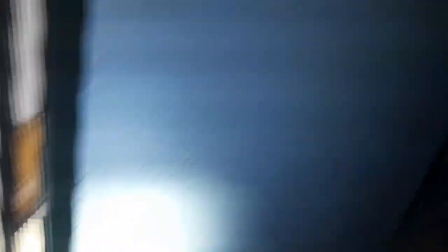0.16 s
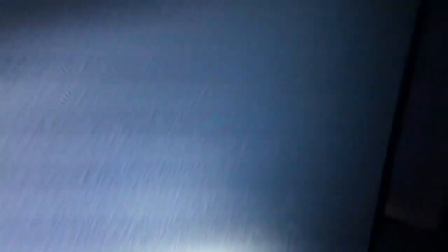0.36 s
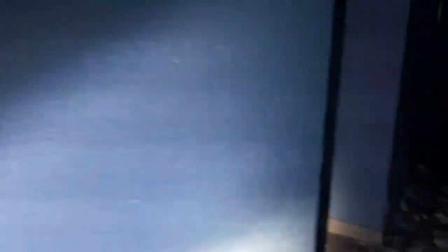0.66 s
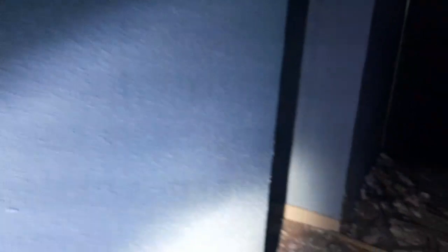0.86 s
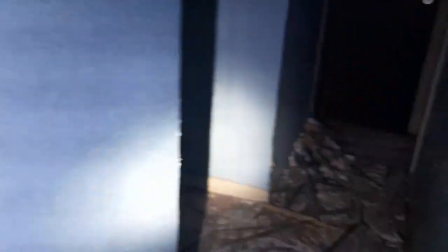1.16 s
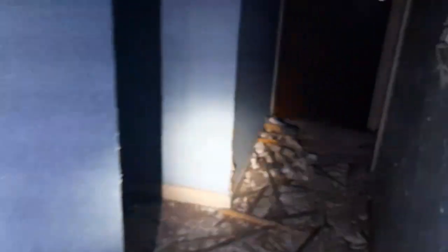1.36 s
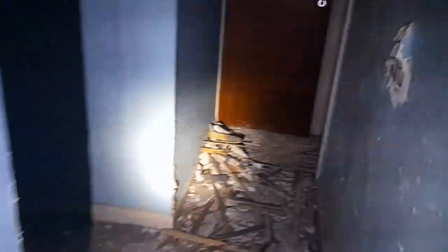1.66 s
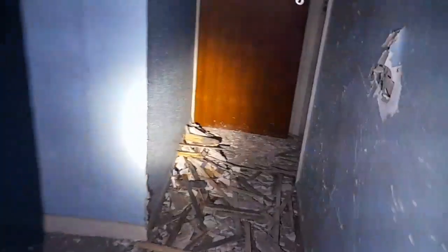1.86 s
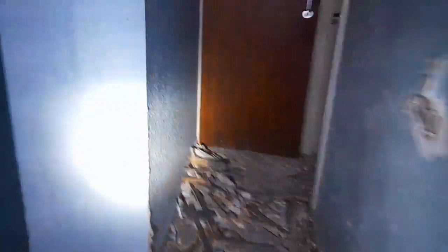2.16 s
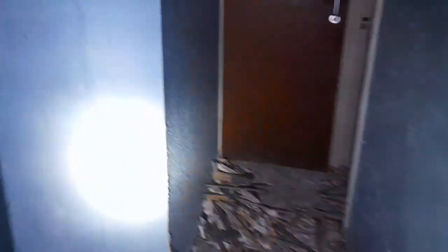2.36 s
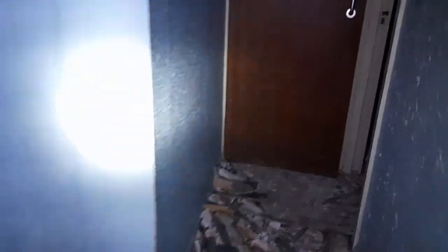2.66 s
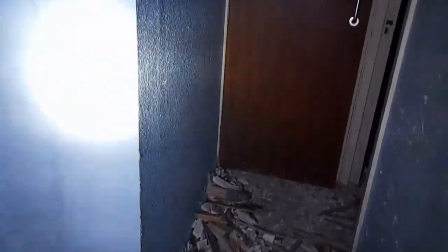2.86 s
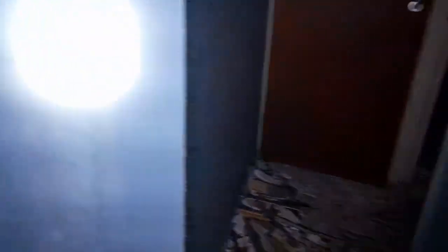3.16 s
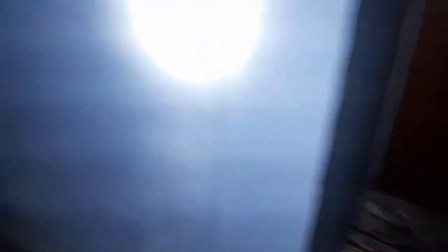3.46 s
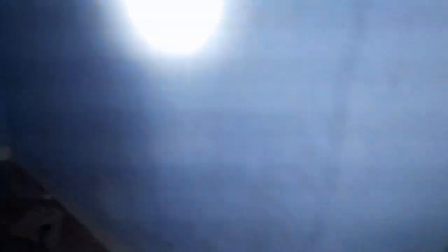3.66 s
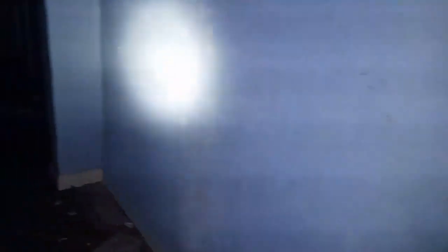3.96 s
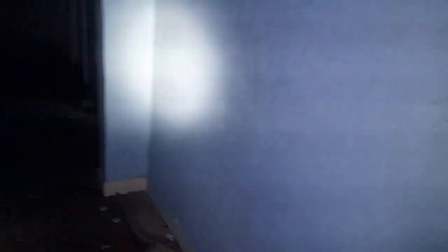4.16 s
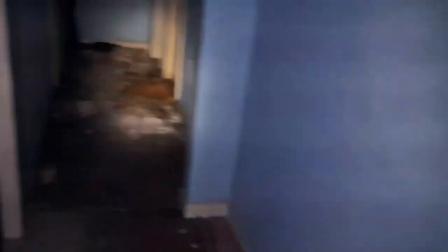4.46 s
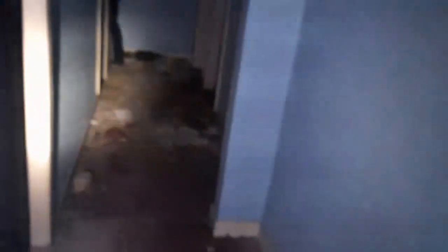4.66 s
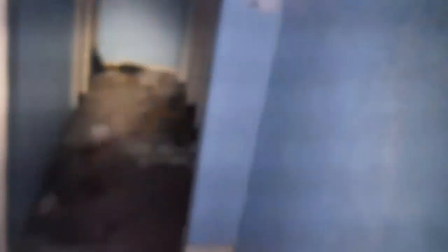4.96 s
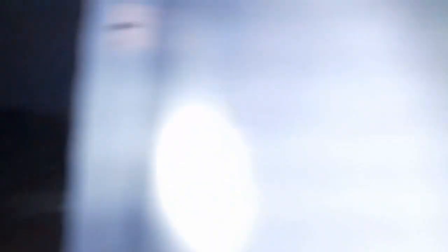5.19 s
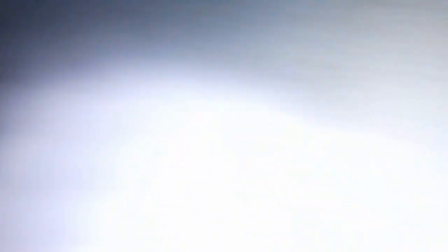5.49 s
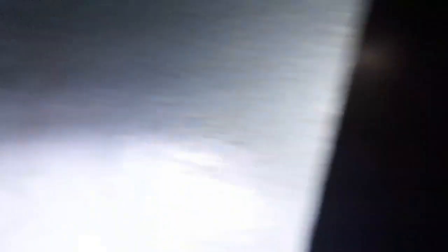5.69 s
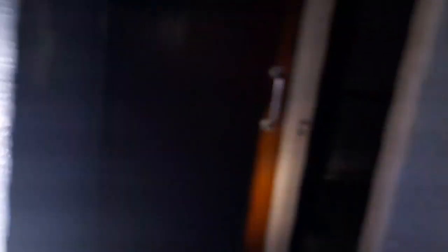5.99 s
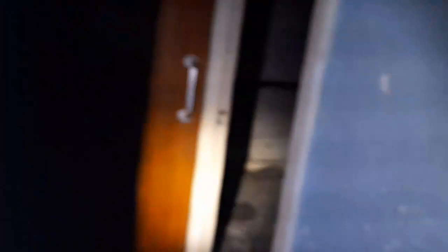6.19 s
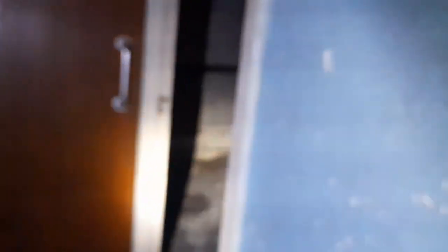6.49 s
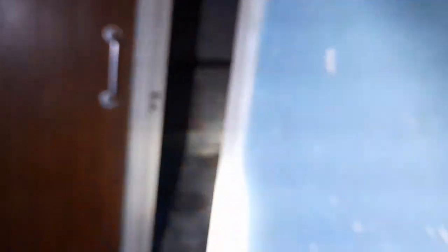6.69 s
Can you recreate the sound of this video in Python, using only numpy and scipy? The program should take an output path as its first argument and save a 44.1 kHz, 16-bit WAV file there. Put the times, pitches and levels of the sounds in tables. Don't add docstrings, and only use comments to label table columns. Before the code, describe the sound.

Footsteps knock on a hollow, gritty floor in a small empty corridor, with cloth rustle, a short door judder and bright debris snaps.

```python
import sys
import numpy as np
from scipy import signal
from scipy.io import wavfile

SR = 44100
rng = np.random.default_rng(int(sys.argv[2]) if len(sys.argv) > 2 else 0)


def transcribe(u):
    v = np.clip(np.atleast_2d(u).T, -1, 1)
    q = np.round(v * 32767).astype(np.int16)
    wavfile.write(sys.argv[1], SR, q)


def voltage_ratio(decibels):
    exponent = np.asarray(decibels, float) / 20
    return 10 ** exponent


N = 301283


def rms_one(x):
    return x / np.sqrt(np.mean(x ** 2) + 1e-20)


def at_hz(points, hz):
    points_hz, values = np.array(points)[:, 0], np.array(points)[:, 1]
    return np.interp(np.log(hz), np.log(points_hz), values)


def band(x, low_hz, high_hz):
    edges_hz = [low_hz, min(high_hz, 0.45 * SR)]
    return signal.sosfilt(signal.butter(2, edges_hz, "band", fs=SR, output="sos"), x)


def drift(rate):
    r = np.exp(-80 * np.pi * rate / SR)
    slow = signal.lfilter([1], [1, -2 * r, r * r], rng.standard_normal(N // 40 + 2002))[2000:]
    return np.interp(np.arange(N) / 40, np.arange(len(slow)), rms_one(slow))


def fade(clicks, t60):
    return signal.lfilter([1], [1, -voltage_ratio(-60 / (t60 * SR))], clicks)


def ring(clicks, hz, t60):
    r = voltage_ratio(-60 / (max(t60, 0.001) * SR))
    w = 2 * np.pi * hz / SR
    return signal.lfilter([0, np.sin(w)], [1, -2 * r * np.cos(w), r * r], clicks + 1e-18)


def stereo_bands(size, low_hz, high_hz, gain_of_band):
    # [f/Hz, left-right likeness]
    likeness = [(60, 0.9), (130, 0.98), (290, 0.76), (640, 0.4), (1410, -0.21), (3100, -0.066),
                (6820, -0.11), (15000, -0.15)]
    edges = low_hz * 2 ** np.arange(0, np.log2(high_hz / low_hz) + 0.3, 1 / 3)
    white = rng.standard_normal((2, 2, size))
    out = 0
    for k, (low, high) in enumerate(zip(edges, edges[1:])):
        centre_hz = np.sqrt(low * high)
        mid, side = band(white[k % 2], low, high)
        alike = np.clip(at_hz(likeness, centre_hz), -1, 1)
        pair = np.sqrt(1 + alike) * mid + np.sqrt(1 - alike) * side * [[1], [-1]]
        out = out + gain_of_band(centre_hz) * pair
    return rms_one(out)


def friction(spectrum, level_db, patchy_db, grains_per_s, grain_db):
    together = drift(62.0)

    def patchy_gain(hz):
        return voltage_ratio(at_hz(spectrum, hz) + patchy_db * (0.45 * together + drift(8.0)))

    top_hz = max(hz for hz, db in spectrum if db > -90)
    noise = stereo_bands(N, spectrum[0][0], top_hz, patchy_gain)
    grain_size = np.minimum(rng.exponential(1, N), 3) ** 2
    grains = (rng.random(N) < grains_per_s / SR) * grain_size
    flare = fade(grains, 0.0072)
    return voltage_ratio(level_db) * rms_one(noise * (1 + voltage_ratio(grain_db) * flare))


def swells(rows, still_db):
    t = np.arange(0, N, 32) / SR
    power = voltage_ratio(2 * still_db)
    for s, rise, fall, db in rows:
        climbing = (s - t) / max(rise, 0.01)
        dying = (t - s) / max(fall, 0.01)
        power = power + voltage_ratio(2 * (db - 20 * np.where(t < s, climbing, dying)))
    return np.interp(np.arange(N) / SR, t, 10 * np.log10(power))


def movement():
    # [peak t/s, rise/s, fall/s, level/dB]
    rustles = [(.5, 0.36, 0.17, -46.5), (.755, 0.16, 0.29, -46), (1.03, 0.36, 0.24, -55),
               (1.5, 0.18, 0.33, -51), (1.69, 0.28, 0.037, -54.5), (1.9, 0.11, 1, -43),
               (2.03, 0.87, 0.66, -44.5), (2.17, .4, .3, -47), (2.28, 0.25, 0.18, -43),
               (2.54, 0.53, 0.049, -57), (2.605, 0.045, 0.045, -78.5), (2.71, 0.024, 0.15, -47),
               (2.88, .1, 0.079, -61.5), (2.99, 0.082, 0.061, -66), (3.32, 0.13, 0.3, -45),
               (3.5, 0.57, 0.67, -54.5), (3.65, 0.11, 0.11, -43.5), (3.82, 1, 0.22, -49),
               (4.62, 0.073, 0.94, -56), (4.72, 0.29, 0.13, -45), (5.04, 0.53, 0.67, -51.5),
               (5.24, 0.22, 0.17, -51), (5.66, 0.27, 0.49, -47), (5.88, 0.64, 0.1, -58),
               (6.2, 1, 0.96, -62), (6.49, 0.18, 0.51, -51), (6.59, 0.38, 0.029, -47),
               (6.765, 0.24, 0.17, -59)]
    # [peak t/s, rise/s, fall/s, level/dB]
    scuffs = [(0, .1, 0.069, -52.5), (.34, 0.32, 1.3, -53), (.51, 0.068, 0.12, -44.5),
              (.8, 0.23, 0.12, -46.5), (1.03, 0.22, 0.26, -52), (1.69, 0.35, 0.041, -48.5),
              (1.89, 0.14, 0.3, -49), (2.01, .15, 0.24, -49), (2.28, 0.032, 0.23, -30),
              (2.39, 0.2, 0.031, -49), (2.46, .04, 0.25, -43.5), (2.99, 0.34, 0.15, -58.5),
              (3.3, 0.18, 0.24, -46), (3.62, 0.35, 0.39, -47.5), (4.24, 0.098, 1.25, -52),
              (4.57, 0.051, 1.14, -49), (4.75, 0.17, 0.56, -48.5), (5.05, 0.29, 0.31, -59.5),
              (5.24, 0.24, 0.38, -50), (5.72, 0.91, 0.13, -51), (5.88, 0.12, 0.13, -49.5),
              (6.47, 0.041, 0.39, -45.5), (6.59, 0.11, 0.029, -46), (6.74, 0.075, 1.3, -57)]
    # [peak t/s, rise/s, level/dB]
    loads = [(0, .1, -61.5), (.43, 0.14, -59), (.74, 0.29, -62), (1.12, 0.16, -56), (1.41, 0.071, -70),
             (1.6, 0.37, -49.5), (1.89, 0.24, -45), (2.01, 0.032, -47.5), (2.39, 0.14, -34),
             (2.55, 0.76, -56), (2.71, 0.031, -35), (2.83, 0.28, -65), (3.28, 0.062, -36.5),
             (3.499, 0.38, -57), (3.64, 0.28, -53.5), (3.761, 0.031, -47), (4.358, 0.15, -44.5),
             (4.56, 0.014, -49.5), (4.76, 0.3, -43), (4.9, 0.29, -62), (5.13, 0.35, -55),
             (5.24, 0.1, -50.5), (5.67, 0.1, -50), (6.0, 0.19, -55), (6.219, 0.47, -63.5),
             (6.592, 0.16, -48), (6.82, 0.26, -46)]
    # [peak t/s, level/dB]
    jolts = [(0, -66), (.51, -36.5), (.77, -49), (0.839, -48.5), (1.34, -54), (1.5, -47), (1.6, -69),
             (1.89, -46), (2.28, -56), (2.71, -58), (2.89, -64), (2.988, -52), (3.3, -49), (3.78, -42),
             (3.888, -48), (4.24, -53), (4.33, -51), (4.62, -54), (4.76, -55), (5.67, -63), (5.97, -55),
             (6.46, -50.5), (6.52, -41), (6.59, -52), (6.73, -42.5), (6.82, -51)]
    # cloth, grit, boards, hand [level/dB]
    still_db = (-74.5, -77.5, -88.5, -76.5)
    settle_s, jolt_rise_s, jolt_fall_s = 0.17, 0.05, 0.1
    cloth = np.concatenate([rustles, np.add(scuffs, [0, 0, 0, -11.5])])
    grit = np.concatenate([scuffs, np.add(rustles, [0, 0, 0, -7.5])])
    boards = [(s, rise, settle_s, db) for s, rise, db in loads]
    hand = [(s, jolt_rise_s, jolt_fall_s, db) for s, db in jolts]
    return [swells(rows, db) for rows, db in zip([cloth, grit, boards, hand], still_db)]


def mic_hiss():
    return voltage_ratio(-77) * rng.standard_normal((2, N))


def hand_sway(level_db):
    # [f/Hz, level/dB per Hz]
    sway = [(25, -23.5), (40, -6), (62, -5.5), (85, -3), (110, -19)]
    return friction(sway, level_db, patchy_db=8.0, grains_per_s=4.6, grain_db=-22.5)


def board_rumble(level_db):
    # [f/Hz, level/dB per Hz]
    rumble = [(53, -28), (90, -13), (135, 2), (262, 1), (400, -6.5), (500, -28.5), (650, -52), (1100, -120)]
    return friction(rumble, level_db, patchy_db=4.0, grains_per_s=14.0, grain_db=-35.0)


def cloth_rustle(level_db):
    # [f/Hz, level/dB per Hz]
    fabric = [(710, -35), (1200, -16), (1590, -3), (1730, -5), (1950, -12), (2130, 5.5), (2830, -7.5),
              (3360, -1.5), (7020, -5), (9210, -7.5), (9930, -8), (13900, -8), (16000, -12)]
    return friction(fabric, level_db, patchy_db=1.87, grains_per_s=120.0, grain_db=-14.0)


def grit_scuff(level_db):
    # [f/Hz, level/dB per Hz]
    grinding = [(150, -29), (250, -2.5), (426, -5), (538, -1), (1090, -5), (1420, -7), (1560, -7.5),
                (2370, -14), (4000, -26), (5200, -35.5), (8800, -120)]
    return friction(grinding, level_db, patchy_db=3.0, grains_per_s=43.0, grain_db=-16.0)


def judder():
    # [t/s, slips per s, level/dB]
    drag = [
        (2.26, 71, -36.5),
        (2.3, 71.3, -19),
        (2.324, 79, -12.5),
        (2.334, 88, -9.5),
        (2.352, 81.5, -11),
        (2.368, 83, -20.5),
        (2.38, 120, -37),
        (2.4, 79, -52),
    ]
    s, rates, levels = np.transpose(drag)
    t = np.arange(N) / SR
    moving = (t > s[0]) & (t < s[-1])
    return np.interp(t, s, rates), np.interp(t, s, levels), moving


def door_panel():
    # [f/Hz, level/dB, t60/s]
    modes = [(167, -4, 0.05), (244, 7, 0.064), (334, -26, 0.054), (536, -13.5, 0.048), (730, -7.5, 0.046),
             (820, -48.5, .04)]
    per_s, level_db, moving = judder()
    turns = np.cumsum(per_s * (1 + 0.04 * drift(31.2)) / SR)
    slips = np.diff(np.floor(turns), prepend=0) * moving * voltage_ratio(level_db - 5.5)
    panel = sum(voltage_ratio(db) * ring(slips, hz, t60) for hz, db, t60 in modes)
    panel = signal.sosfilt(signal.butter(4, 135, "high", fs=SR, output="sos"), panel)
    return panel * voltage_ratio([[-1.0], [1.0]])


def door_scrape():
    _, level_db, moving = judder()
    body = band(rng.standard_normal((2, N)), 450, 2500)
    grind = body + voltage_ratio(-6.5) * rng.standard_normal((2, N))
    return band(voltage_ratio(level_db - 16.5) * grind * moving, 100, 14000)


def squeak():
    # start t/s, end t/s, f/Hz, level/dB
    rubber = (3.771, 3.815, 12700, -62)
    start, end, hz, db = rubber
    t = np.arange(N) / SR
    tone = rms_one(ring(ring(rng.standard_normal(N), hz, 0.012), hz, 0.012))
    return voltage_ratio(db) * tone * np.sin(np.pi * np.clip((t - start) / (end - start), 0, 1)) ** 0.5


def snaps(table, crumble_db, crumble_t60, lag=0, lag_spread=16):
    rows = np.array(table)
    chance = rng.uniform(-0.89, 1, (len(table), 2))
    at = ((rows[:, 0] + 0.0007) * SR).astype(int)
    at_right = at + lag + (lag_spread * chance[:, 0]).astype(int)
    white = rng.standard_normal((2, N))
    out = np.zeros((2, N))
    bands_hz = [(420, 810), (800, 1290), (1400, 2190), (2100, 3800), (3000, 4580), (4200, 5850),
                (6000, 8460), (9600, 12700), (12500, 16000)]
    for k, (low_hz, high_hz) in enumerate(bands_hz):
        octave = np.log2(low_hz * high_hz / 925000.0) / 2
        off_pitch_db = np.abs(rows[:, 3] * (octave - rows[:, 2]))
        height = voltage_ratio(rows[:, 1] - off_pitch_db + 7.5) * (-1) ** k
        clicks = np.zeros((2, N))
        clicks[0, at] = height * voltage_ratio(-4.0 + chance[:, 1])
        clicks[1, at_right] = height * voltage_ratio(-4.0 - chance[:, 1])
        crumble = fade(clicks + 1e-18, crumble_t60) * white
        out += band(clicks + voltage_ratio(crumble_db) * crumble, low_hz, high_hz) * SR / 2 / (high_hz - low_hz)
    return out


def skids():
    # [t/s, peak level/dB, pitch/octaves above 1 kHz, narrowness/dB per octave]
    slides = [(1.094, -58, 5, -0.5), (1.327, -58, 2, 6), (1.817, -48.5, 4.5, 1.5), (4.194, -52, 1.1, 6),
              (4.562, -47.5, 0.35, 6), (5.609, -52, 2, 12), (5.621, -44, 2, 3.5), (5.907, -53, 2, 13.5),
              (6.436, -50.5, -0.5, 5), (6.47, -51.5, -3, 5), (6.448, -51.5, 0.5, 2),
              (6.518, -38.5, 0.42, 12.5), (6.54, -62, 0.8, 19), (6.567, -55, 0.5, 9),
              (6.779, -43.5, 3, 6.5)]
    return voltage_ratio(-18.0) * snaps(slides, crumble_db=0.5, crumble_t60=0.1)


def debris_snaps():
    # [t/s, peak level/dB, pitch/octaves above 1 kHz, narrowness/dB per octave]
    pieces = [(0.561, -46, 1, 2), (0.588, -38.5, 5.5, 3.5), (0.721, -46, 3, 3), (0.907, -47.5, 1.5, 8.5),
              (1.5495, -30, 1.56, 10.5), (1.675, -51, -2, 2), (2.226, -37.5, -1, 2), (2.634, -43.5, 3.5, 2),
              (2.692, -33.5, 1.5, 2.5), (2.755, -40, -0.4, 4.5), (2.849, -50, 1, 2), (3.249, -49, -.5, 13),
              (3.277, -41, 2.5, 4.5), (4.3205, -21, 3, 9.5), (4.615, -25, 3, 6), (5.571, -43, 5.5, 3.5),
              (5.905, -56, 3, -1), (5.982, -45.5, 1.0, 15.5), (6.665, -47, 1.3, 4)]
    return snaps(pieces, crumble_db=-22.5, crumble_t60=0.044)


def near_ticks():
    # [t/s, peak level/dB, pitch/octaves above 1 kHz, narrowness/dB per octave]
    ticks = [(0.863, -38, -0.27, 26), (1.566, -41, 6, 14), (2.5285, -30.5, 0.87, 10.5),
             (3.042, -58, 2.8, 5), (3.335, -39, 2.5, 11), (3.397, -47, 3.1, 8.5), (3.426, -41.5, 3, 4),
             (3.5105, -31, 1.33, 7), (4.311, -51.5, 2.8, 8), (4.736, -47, 3.5, -1), (4.834, -55, 4, -0.5),
             (5.572, -51.5, -2, 1), (5.794, -48, 1.5, 4), (5.996, -53, 1.8, 11), (6.781, -49, -1, 11),
             (6.828, -44.5, -.5, 15)]
    breaks = [
        (4.32, -22, 3.35, 4.1),
        (4.615, -21, 5.4, 4.6),
    ]
    break_echoes = [(4.33, -36, 3, 6), (4.3345, -27, 2.3, 12), (4.3415, -29, 2.7, 18), (4.6295, -29, 3.4, 4),
                    (4.632, -30, 2.2, 10), (4.638, -32, 2.5, 12)]
    out = snaps(ticks, crumble_db=-20.5, crumble_t60=0.014, lag_spread=4)
    out = out + snaps(breaks, crumble_db=-33.0, crumble_t60=0.0041, lag=7, lag_spread=0)
    return out + voltage_ratio(-2.0) * snaps(break_echoes, crumble_db=-10.5, crumble_t60=0.009, lag_spread=3)


def latch_crack():
    # [t/s, level/dB]
    stages = [
        (2.4614, -2),
        (2.4622, 4),
        (2.4636, 2),
        (2.4658, -2),
    ]
    # [f/Hz, level/dB, t60/s]
    modes = [(500, -10, .005), (1000, -12, .002), (1750, -6, .003), (3100, -14, .0012), (4700, -8, .0012),
             (6900, -3, .0015), (8000, -7, .0015), (11800, -6, .0014), (12900, 0, .0014),
             (14000, -8, .0016)]
    at = [round(s * SR) for s, db in stages]
    stage_db = np.array(stages)[:, 1]
    out = np.zeros(N)
    for (hz, level_db, t60), chance in zip(modes, rng.normal(0, 1, (len(modes), len(stages)))):
        clicks = np.zeros(N)
        clicks[at] = voltage_ratio(stage_db + level_db - 6.5 + 2.3 * chance) * np.sign(chance)
        out += ring(clicks, hz, t60)
    return np.array([np.roll(out, 9), out]) * voltage_ratio([[1.5], [-1.5]])


def thuds(table, t60):
    # [f/Hz, level/dB, t60/s]
    floorboards = [(63.2, 0, 0.48), (123, -25, 0.088), (143, 3, 0.09), (205, -2.5, 0.081), (249, 1.5, 0.14),
                   (332, -15.5, 0.12), (425, -7.5, 0.048), (484.6, -7.5, 0.1), (527.7, -11.5, 0.16),
                   (607, -8.5, 0.13), (725, -28.5, 0.048), (950, -21.5, 0.02)]
    out, size, count = np.zeros(N + SR), SR // 2, len(floorboards)
    for (s, db, hz, hard_db), chance in zip(table, rng.normal(0, 1, (len(table), count + 3))):
        push = np.zeros(size)
        contacts = (np.abs(chance[count:]) * 0.02 * SR).astype(int) + 1
        push[contacts] = 1.31 * np.sign(chance[:3])
        push[0] = 1
        body = ring(np.arange(size) == 0, hz, t60)
        for (mode_hz, mode_db, mode_t60), c in zip(floorboards, chance):
            level_db = mode_db - 14.5 + 0.87 * c + (hard_db + 8.0) * (mode_hz > 400)
            body += voltage_ratio(level_db) * ring(push, mode_hz * (1 + 0.061 * c), mode_t60)
        start = int(s * SR)
        out[start:start + size] += voltage_ratio(db - 2.0) * body
    return band(out[:N], 112, 690)


def rubble_knocks():
    # [t/s, peak level/dB, main f/Hz, hardness/dB]
    knocks = [(0.492, -23, 62, -9), (1.62, -39.5, 194, -46.5), (1.842, -33.5, 205, -10),
              (2.224, -26.5, 310, -16), (2.302, -20.5, 190, -5.5), (2.318, -21.5, 169, -8),
              (2.579, -43, 173, -14), (2.692, -19.5, 250, 2.5), (2.705, -26.5, 190, -10),
              (2.735, -29.5, 159, -3), (3.259, -36.5, 226, -2), (3.713, -37, 212, -9),
              (4.191, -38.5, 215, -29.5), (4.616, -34.5, 282, -32), (4.729, -38.5, 220, -32),
              (5.625, -40.5, 358, -27), (6.494, -31.5, 135, 2), (6.539, -34.5, 140, 1.5),
              (3.884, -46, 124, -20), (6.718, -50, 66, 5)]
    return thuds(knocks, t60=0.13)


def footfalls():
    # [t/s, peak level/dB, main f/Hz, hardness/dB]
    steps = [(0.53, -39.5, 121, -27), (0.761, -49, 65, -4), (0.84, -43, 57, 3), (1.467, -27, 108, -16),
             (1.77, -44, 128, -20), (2.408, -39, 164, 7), (2.459, -40, 250, -11), (2.966, -50, 131.3, -19),
             (3.308, -41.5, 186.4, 1), (3.862, -50, 110, -20), (4.217, -33.5, 150.4, -33.5),
             (6.449, -43.5, 307, -6), (6.653, -42.5, 300, -7)]
    return thuds(steps, t60=0.41)


def hall(distant, close):
    # [f/Hz, t60/s]
    hall_t60 = [(100, 0.51), (500, 0.38), (1500, 0.34), (4000, 0.34), (10000, 0.22)]
    # [delay/s, level/dB]
    echoes = [
        (.0085, -17),
        (.0148, -0.5),
        (0.021, -13.5),
        (.031, -16),
    ]
    t = np.arange(int(0.7 * SR)) / SR
    tail = stereo_bands(len(t), 52.3, 16000, lambda hz: voltage_ratio(-60 * t / at_hz(hall_t60, hz)))
    tail = tail * np.clip(t / 0.006, 0, 1) / np.sqrt(len(t)) * voltage_ratio(1.5)
    out = signal.fftconvolve(distant + close, tail, axes=1)[:, :N]
    for delay, db in echoes:
        for side in range(2):
            lag = int(delay * SR) + rng.integers(0, 25)
            out[side, lag:] += voltage_ratio(db) * rng.choice([-1, 1]) * distant[side, :-lag]
    return out


def scene():
    cloth_db, grit_db, rumble_db, sway_db = movement()
    far = debris_snaps() + skids() + door_scrape()
    near = near_ticks()
    blows = (footfalls() + rubble_knocks()) * np.ones((2, 1))
    latch, panel = latch_crack(), door_panel()
    distant = voltage_ratio(-1.0) * far + voltage_ratio(-10.5) * blows
    close = voltage_ratio(-5.5) * near + voltage_ratio(-8.5) * latch + voltage_ratio(-11.5) * panel
    diffuse = hall(distant, close)
    diffuse += cloth_rustle(cloth_db) + grit_scuff(grit_db)
    diffuse += board_rumble(rumble_db) + hand_sway(sway_db) + mic_hiss()
    treble_end = signal.cheby2(20, 50, 15900, fs=SR, output="sos")
    diffuse = signal.sosfilt(treble_end, diffuse + far + panel)
    return near + latch + blows + diffuse + squeak()


def roll_off(x):
    return signal.sosfilt(signal.butter(12, 17000, fs=SR, output="sos"), x)


def record(dry):
    notch_hz, notch_width_hz, low_cut_hz = 9100, 450, 36
    notched = signal.lfilter(*signal.iirnotch(notch_hz, notch_hz / notch_width_hz, fs=SR), dry)
    low_cut = signal.butter(3, low_cut_hz, "high", fs=SR, output="sos")
    heard = signal.sosfilt(low_cut, 0.65 * notched + 0.26 * dry)
    heard = 0.8 * np.tanh(heard / 0.8)
    return roll_off(heard)


dry = scene()
out = record(dry)
transcribe(out)
```